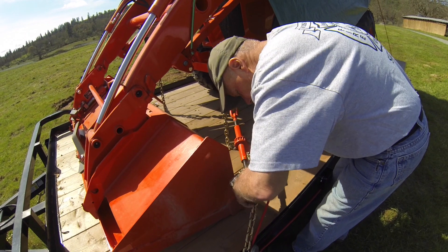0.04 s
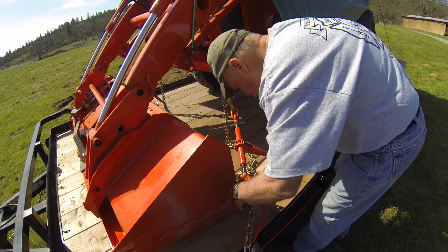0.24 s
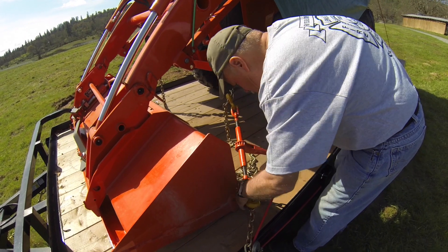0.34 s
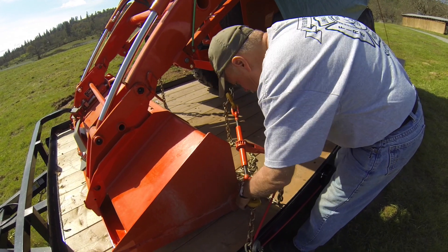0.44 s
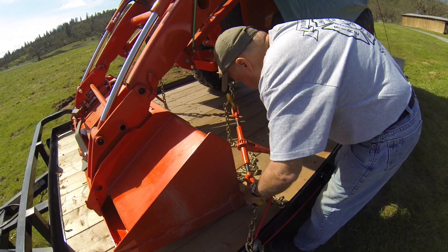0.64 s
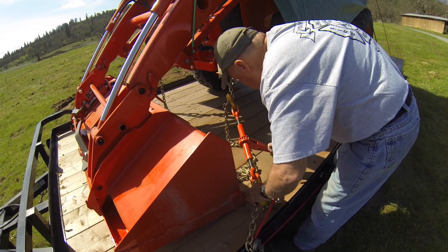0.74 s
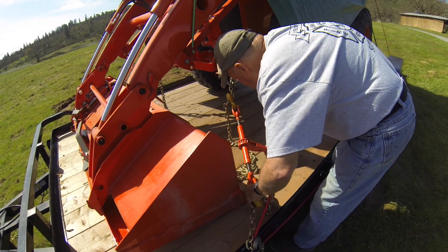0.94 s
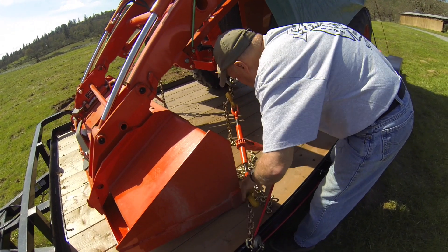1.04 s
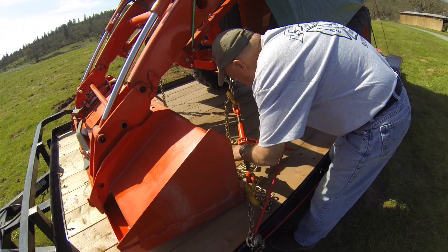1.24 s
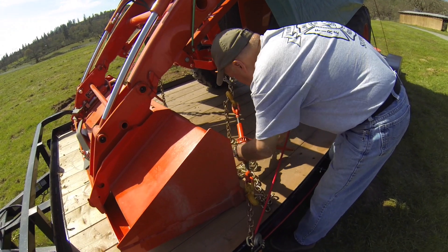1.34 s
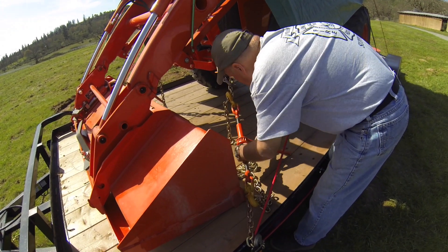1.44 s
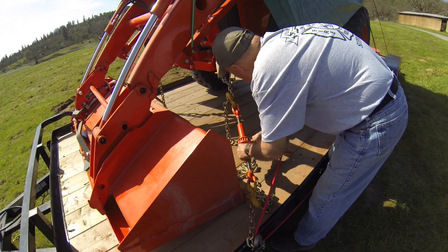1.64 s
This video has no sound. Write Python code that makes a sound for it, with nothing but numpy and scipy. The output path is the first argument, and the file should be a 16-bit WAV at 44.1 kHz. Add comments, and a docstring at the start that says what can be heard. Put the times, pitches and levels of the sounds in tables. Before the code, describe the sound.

A steel chain rattles and clanks against its hook and tightener on a wooden trailer deck. The tightener drops with a ringing crash, followed by a tiny squeak and two dull bumps. Light wind buffets the microphone outdoors.

```python
"""A steel chain and its load binder are handled on a trailer deck beside a tractor, in an open field.
From the start a light wind buffets the microphone over a faint hiss, and the chain rumbles on the deck.
Through the first second links click and slither, while hook and binder clank and ring in their modes.
Just after one second the binder drops, setting the deck and the steel on it ringing.
As they fade, a link binds and squeaks, and the deck boards take two dull bumps."""
import sys
import numpy as np
from scipy import signal
from scipy.fft import rfft, irfft
from scipy.io import wavfile

SR = 44100
rng = np.random.default_rng(int(sys.argv[2]) if len(sys.argv) > 2 else 0)


def store_pcm(level_fs):
    """Save levels as 16-bit WAV."""
    pcm = np.round(np.clip(level_fs, -1, 1) * 32767).astype(np.int16)
    wavfile.write(sys.argv[1], SR, np.atleast_2d(pcm).T)


N = 74970


def amp(db):
    """Decibels to amplitude ratio."""
    return 10 ** (np.asarray(db) / 20)


def unit(x):
    """Normalisation to rms 1."""
    return x / np.sqrt(np.mean(x ** 2) + 1e-20)


def clock():
    """Time in seconds at each sample."""
    return np.arange(N) / SR


def curve(rows):
    """Linear interpolation between rows of time_s, value."""
    return np.interp(clock(), *np.transpose(rows))


def coloured(x, spectrum):
    """Filtering as a product of spectra; rows of frequency_hz, level_db give the gain."""
    points_hz, points_db = np.transpose(spectrum)
    hz = np.fft.rfftfreq(2 * N, 1 / SR)
    gain = amp(np.interp(np.log(hz + 1), np.log(points_hz), points_db))
    return irfft(rfft(x, 2 * N) * gain)[:N]


def noise(spectrum):
    """Filtered white noise of rms 1."""
    return unit(coloured(rng.standard_normal(N), spectrum))


def add(out, start_s, x):
    """Superposition: x joins out from start_s."""
    i = max(0, round(start_s * SR))
    out[i:] += x[:N - i]


def struck(hits, spectrum, decay, attack_s=0.00073):
    """Crowded modes act as noise; blows add in power. Decay: first_t60_s, tail_t60_s, tail_db."""
    first_t60_s, tail_t60_s, tail_db = decay
    t, power = clock(), np.zeros(N)
    envelope = amp(-60 * t / first_t60_s) + amp(tail_db - 60 * t / tail_t60_s)
    envelope *= 1 - np.exp(-t / attack_s)
    for start_s, level_db in hits:
        add(power, start_s, (amp(level_db) * envelope) ** 2)
    return np.sqrt(power) * noise(spectrum)


def ringing(hits, modes, attack_s, scatter_db=1):
    """Free vibration: each blow excites every mode as a damped sinusoid of random phase."""
    t, out = clock(), np.zeros(N)
    for start_s, hit_db in hits:
        for pitch_hz, mode_db, t60_s in modes:
            wave = np.sin(2 * np.pi * (pitch_hz * t + rng.random())) * (1 - np.exp(-t / attack_s))
            level_db = hit_db + mode_db + scatter_db * rng.standard_normal()
            add(out, start_s, wave * amp(level_db - 60 * t / t60_s))
    return out


def wind_and_hiss():
    """Turbulence: gusts put slow pressure swings on the microphone, over the field's steady hiss."""
    # strength of the buffeting: time_s, level_db
    gusts = [(0, -50.5), (.14, -46), (.22, -37), (.3, -63), (.37, -36.5), (.45, -63), (.7, -41),
             (.885, -53), (.94, -24), (1.02, -25), (1.07, -36), (1.14, -24.5), (1.18, -18), (1.23, -34),
             (1.3, -30.5), (1.37, -45.5), (1.47, -37), (1.7, -39)]
    # spectra of buffeting and background: frequency_hz, level_db
    buffet = [(5, -0.5), (15, -2), (38, 0), (60, -11), (100, -13), (200, -28), (500, -52), (1500, -90)]
    hiss = [(60, 16), (130, 23.5), (250, 13), (500, 6.5), (900, -52), (1700, -32), (2400, -18.5),
            (3200, -12.5), (4700, -25.5), (7000, -20), (7500, -15), (8300, -22), (10500, -26), (10950, -32),
            (11250, -15.5), (11600, -27), (12700, -42), (13650, -32), (14600, -52.5), (15800, -58)]
    return amp(curve(gusts)) * noise(buffet) + amp(-49) * noise(hiss)


def chain_rumble():
    """Forced vibration: the dragging chain drives the deck with low noise."""
    # strength of the drag: time_s, level_db
    drag = [(0, -38.5), (.15, -44.5), (.3, -38), (.52, -42.5), (.72, -40), (.79, -46.5), (.86, -36.5),
            (.92, -36), (1.0, -50), (1.3, -49), (1.7, -58)]
    # deck response: frequency_hz, level_db
    spectrum = [(50, -15), (85, -5), (125, 3), (230, 3), (400, -5), (900, -9), (1400, -17.5), (2200, -29),
                (5000, -31.5), (12000, -74)]
    return amp(curve(drag)) * noise(spectrum)


def link_clicks():
    """Hard impact: link meets link so briefly that the click is mostly treble."""
    # collisions: start_s, level_db
    hits = [(.036, -47), (.118, -55), (.281, -46), (.371, -44), (.523, -47), (.567, -33.5), (.608, -35.5),
            (.6895, -46), (.7195, -44.5), (.7435, -44), (.7605, -39), (.769, -45), (.8055, -48),
            (.817, -40), (.8655, -42), (.888, -34.5), (.894, -41.5), (.9515, -44), (.975, -51.5),
            (1.012, -51), (1.103, -40.5), (1.143, -42), (1.178, -57), (1.300, -51.5), (1.313, -50),
            (1.376, -53.5), (1.516, -59.5)]
    # link response: frequency_hz, level_db
    spectrum = [(1200, -23), (2500, -13), (3500, 5.5), (5000, -2.5), (7000, 0), (9200, 0.5), (11000, -13.5),
                (13000, -22), (15500, -29)]
    return struck(hits, spectrum, decay=(0.0062, 0.059, -11), attack_s=0.000067)


def clanks():
    """Frequency-dependent damping: hook and binder crack, the deck thuds, and the treble dies first."""
    # blows: start_s, thud_db, clank_db, bite_db, clink_db, tick_db
    blows = [(0.055, -42.5, -37.5, -42, -40, -58), (0.1028, -43, -49, -43.5, -29, -44.5),
             (0.115, -39.5, -60, -65, -46, -62), (.188, -46.5, -47, -60, -61, -69),
             (0.2267, -33, -29.5, -27, -44, -51.5), (0.2467, -27, -21, -27.5, -31.5, -46),
             (.302, -40, -28, -36, -34.5, -51), (.353, -42, -21.5, -24, -33.5, -53),
             (.433, -49, -28.5, -33, -40, -60), (0.44, -39, -27.5, -55, -63, -69),
             (0.466, -35, -36, -69, -59, -57), (0.5397, -46, -23, -64, -25, -48),
             (0.559, -39.5, -33.5, -50, -35.5, -43), (.6195, -32, -21, -24, -16.5, -32),
             (0.631, -53, -22, -29, -43, -45), (0.6476, -38.5, -25, -24, -23, -38),
             (0.8125, -56, -27, -39, -36.5, -66), (.841, -55, -26.5, -55, -38, -54),
             (0.874, -32, -29, -38, -38.5, -74), (.899, -40.5, -28.5, -39, -43, -45.5)]
    # spectra of the deck, four bands of the steel and the contact itself: frequency_hz, level_db
    thud = [(90, -11.5), (160, -15), (230, -7), (360, 7), (480, -10.5), (700, 2), (1500, -73)]
    clank = [(200, -34), (400, -10.5), (470, -7.5), (620, -1.5), (720, -6), (870, 1.5), (1250, -6),
             (1600, -15.5), (2200, -35.5), (3500, -39), (8000, -90)]
    bite = [(900, -45), (1400, 7.5), (1650, 7), (1950, 0.5), (2150, -4), (2400, 5.5), (2750, -23),
            (5000, -56.5), (12000, -93)]
    clink = [(1400, -35.5), (2400, -9), (3000, 3.5), (3400, 4.5), (3900, -5.5), (4500, -5.5), (5600, -46),
             (9000, -46), (13000, -80)]
    tick = [(2500, -27), (5000, 9), (7000, 4.5), (9200, 2.5), (10500, -8), (12500, -22), (15500, -32)]
    crack = [(400, -15), (900, 0.5), (1600, 7), (2400, -1), (3400, 1.5), (4800, -13.5), (8000, -24),
             (14000, -51)]
    start_s, thud_db, clank_db, bite_db, clink_db, tick_db = np.transpose(blows)
    knocks = (struck(zip(start_s, thud_db), thud, decay=(0.19, 1, -11.5))
              + struck(zip(start_s, clank_db), clank, decay=(0.1, 0.6, -13))
              + struck(zip(start_s, bite_db), bite, decay=(0.021, 0.2, -13.5))
              + struck(zip(start_s, clink_db), clink, decay=(0.018, 0.15, -17))
              + struck(zip(start_s, tick_db), tick, decay=(0.033, 0.19, -13.5)))
    cracks = struck(zip(start_s, bite_db), crack, decay=(0.0071, 0.03, -34), attack_s=0.00035)
    return knocks + amp(3.5) * cracks


def link_ring():
    """Modes of a ring: a free-hanging link sounds high, short-lived partials when struck."""
    # blows on the link: start_s, level_db
    hits = [(.103, -34), (.5405, -34), (.817, -44)]
    # link modes: pitch_hz, level_db, t60_s
    modes = [(3350, -9.5, 0.049), (3400, 1, 0.014), (3674, -20, 0.083), (4480, -9.5, 0.041),
             (5330, -8, 0.0364), (6560, -11.5, 0.054), (8980, -9.5, 0.034)]
    return ringing(hits, modes, attack_s=0.00079)


def chain_slither(contacts_per_s=1100, spread_db=4.5, edge_s=0.006):
    """Shot noise: sliding links make a shower of tiny contacts at random instants."""
    # slides of the chain: start_s, length_s, level_db
    slides = [(0.246, 0.048, -53.5), (0.298, 0.027, -53), (0.553, .045, -51.5), (0.617, 0.033, -34.5),
              (0.656, 0.022, -51.5), (0.802, 0.12, -56.5)]
    # spectrum of the shower: frequency_hz, level_db
    spectrum = [(1500, -27), (3500, 11), (5000, -3), (7000, 4), (9200, 2), (11000, -4), (13000, -12),
                (15300, -12), (15900, -23)]
    contacts = (rng.random(N) < contacts_per_s / SR) * amp(spread_db * rng.standard_normal(N))
    white_click = struck([(0.00078, 0)], [(20, 0.0082), (20000, 0)], decay=(0.0073, 0.022, -25))
    shower = unit(signal.fftconvolve(contacts, white_click)[:N])
    t, motion = clock(), np.zeros(N)
    for start_s, length_s, level_db in slides:
        inside_s = np.minimum(t - start_s, start_s + length_s - t)
        motion += amp(level_db) * np.clip(inside_s / edge_s + 0.5, 0, 1)
    return motion * unit(coloured(shower, spectrum))


def binder_ring():
    """Inharmonic modes: the struck binder rings on at its natural frequencies."""
    # blows on the binder: start_s, level_db
    hits = [(.2465, -32), (.5405, -36.5), (.6195, -23)]
    # binder modes: pitch_hz, level_db, t60_s
    modes = [(928, 0, .56), (1214, -5, .32), (1617, -5, .22), (1931, -12, .2), (1971, -12, .2),
             (2085, -13, .2), (371, -10, .4), (861, -6, .3), (1039, -7, .3), (1141, -8, .2),
             (1324, -17, .5), (1818, -15, .25), (2270, -14, .15), (3295, -14, .13), (3500, -16, .13),
             (3682, -18, .13)]
    return ringing(hits, modes, attack_s=0.001)


def binder_drop():
    """Impulse excitation: the binder lands and settles; its first contact rings the deck."""
    # landings: start_s, level_db
    hits = [(1.0575, -15.5), (1.069, -25), (1.089, -33)]
    # spectra of the low crash and bright clash: frequency_hz, level_db
    low_band = [(60, 6), (130, -8), (350, 1.5), (470, -4), (650, -2), (1100, 1), (1500, -9.5), (2000, -27),
                (2800, -44), (6000, -83)]
    bright_band = [(1200, -26), (2200, -9.5), (2800, -6.5), (3600, 6), (4500, -15), (5400, -11.5),
                   (6500, -24), (10000, -30), (15000, -61)]
    # modes of the deck and the steel on it: pitch_hz, level_db, t60_s
    modes = [(165.5, -11.5, 0.63), (246.8, 2.5, 0.28), (334.7, 0.5, 0.19), (592, -10.5, 0.4),
             (585, -27, 0.15), (658.2, -21, 1.83), (783, -46, 0.46), (853, -13, 0.17), (1024, -6, 0.34),
             (1050, -19, 0.32), (1308, -19, 0.58), (1428, -20.5, 0.65), (1400, -53, 0.41),
             (1780, -29.5, 0.65)]
    crash = amp(-3) * struck(hits, low_band, decay=(0.22, 1, -17), attack_s=0.00102)
    clash = amp(-18) * struck(hits, bright_band, decay=(0.017, 0.19, -4))
    deck = amp(-0.5) * ringing(hits[:1], modes, attack_s=0.013)
    return crash + clash + deck


def link_squeak(peak_s=1.309, half_width_s=0.0047, peak_db=-40.5):
    """Friction: a link binds for an instant and gives a pulse of narrow-band noise."""
    # squeak resonance: frequency_hz, level_db
    spectrum = [(2000, -40), (2900, -19), (3110, 0), (3330, -26), (3600, -17), (3800, -12), (4200, -30),
                (10000, -68)]
    offset = (clock() - peak_s) / half_width_s
    envelope = amp(peak_db) / (1 + offset ** 2) * (offset > -2)
    return envelope * noise(spectrum)


def deck_thumps():
    """Damped vibration: bumps on the deck boards sound dull and die quickly."""
    # bumps: start_s, level_db
    hits = [(1.409, -26.5), (1.462, -37)]
    # board response: frequency_hz, level_db
    spectrum = [(60, -11), (150, -9), (215, 6.5), (280, -6), (370, -4), (480, -8.5), (800, -21),
                (1200, -24.5), (1800, -54), (3500, -45.5), (7000, -68), (14000, -90)]
    return struck(hits, spectrum, decay=(0.2, 0.2, -19), attack_s=0.00033)


def scene():
    """Superposition in a free field: all sources add in one channel, without echoes."""
    return (wind_and_hiss() + chain_rumble() + link_clicks() + clanks() + link_ring()
            + chain_slither() + binder_ring() + binder_drop() + link_squeak() + deck_thumps())[None]


def record(dry):
    """Band limiting: a steep zero-phase low-pass removes the highest treble."""
    cutoff_hz = 15800
    return signal.sosfiltfilt(signal.butter(16, cutoff_hz, fs=SR, output="sos"), dry)


dry = scene()
out = record(dry)
store_pcm(out)
```